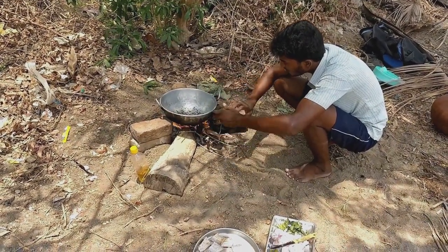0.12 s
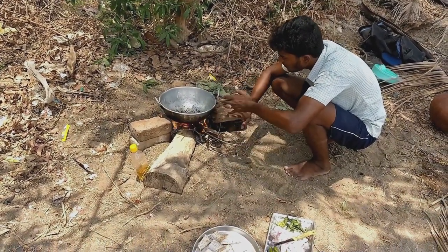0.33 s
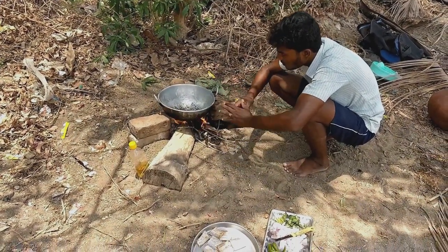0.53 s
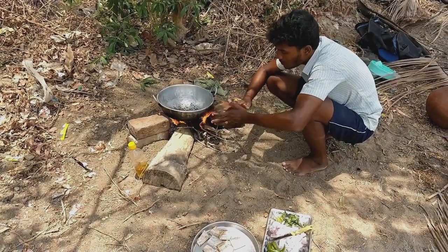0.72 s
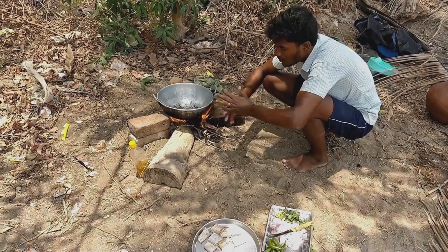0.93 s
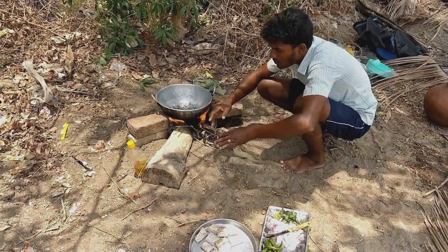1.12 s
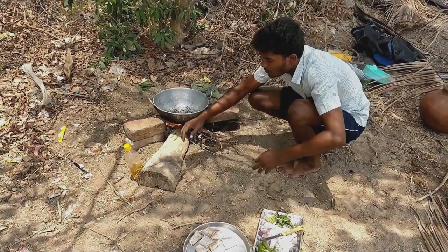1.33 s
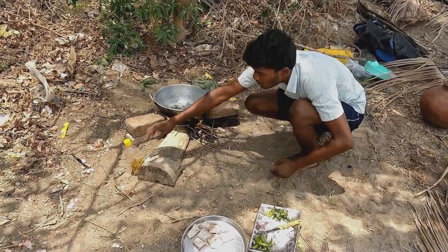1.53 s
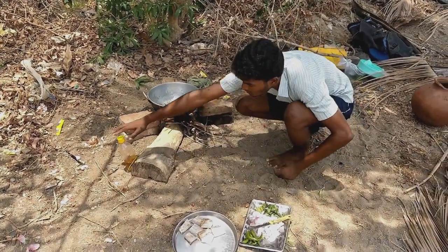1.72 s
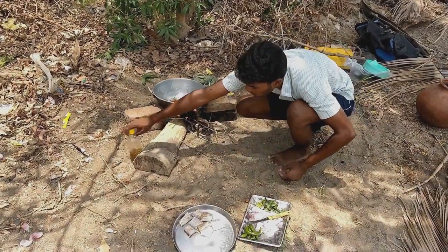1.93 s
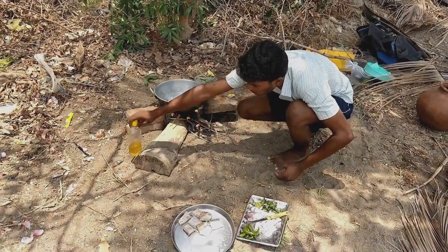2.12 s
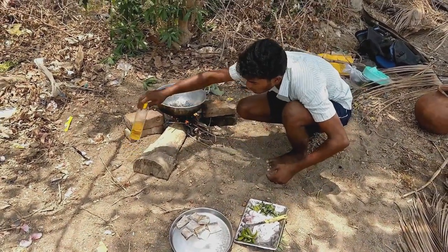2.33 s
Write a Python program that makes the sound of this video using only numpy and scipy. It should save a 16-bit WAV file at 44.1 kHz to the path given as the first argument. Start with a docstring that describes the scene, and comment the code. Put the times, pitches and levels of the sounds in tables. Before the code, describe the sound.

A small outdoor wood fire cracks loudly once, then hisses and ticks as wind buffets the microphone

```python
"""Outdoors, a small wood fire under a pan, heard at two microphone ports.
The fire hisses and roars softly (shaped noise), with low flares (narrow noise) and spits (noise bursts).
It cracks loudly once and ticks now and then: coloured impulses with scattered echoes.
A gust buffets the ports, mostly the left one: rumbling noise, wavering low thumps and a rough fizz."""
import sys
import numpy as np
from scipy import signal
from scipy.fft import rfft, irfft, next_fast_len
from scipy.io import wavfile
from scipy.ndimage import uniform_filter1d, map_coordinates

SR = 44100
rng = np.random.default_rng(int(sys.argv[2]) if len(sys.argv) > 2 else 0)


def master_out(mix):
    """Clip the mix to full scale and print it as 16-bit PCM to the path in sys.argv[1]."""
    frames = np.transpose(np.atleast_2d(mix))
    ceiling = np.clip(frames, -1, 1)
    pcm = np.round(ceiling * 32767).astype(np.int16)
    wavfile.write(sys.argv[1], SR, pcm)


N = 110250

# Source levels are nominal, ahead of the port colour.
# Wind strength before the port imbalance: (time [s], level [dB])
WIND_STRENGTH = [(0, -61), (.3, -56), (.6, -64), (.9, -54.5), (1.1, -54.5), (1.22, -45.5), (1.42, -44),
                 (1.6, -43.5), (1.75, -48.5), (1.9, -49.5), (2.1, -53.5), (2.5, -58.5)]
# Rumble spectrum: (frequency [Hz], gain [dB])
RUMBLE_TONE = [(8, 1), (25, 5.5), (40, -4), (70, -10.5), (120, -17.5), (250, -28.5), (500, -36),
               (1500, -68), (4000, -120)]
# Eddies at each port: (time [s], length, 4 sigma [s], level [dB], mean pitch [Hz])
EDDIES_LEFT = [(1.01, 0.063, -44, 39.9), (1.13, 0.047, -41, 35.1), (1.225, 0.069, -31.5, 26.05),
               (1.257, 0.019, -24, 45), (1.275, 0.024, -30, 112.7), (1.342, 0.049, -20, 65),
               (1.366, 0.023, -30, 130), (1.39, 0.044, -26, 54.74), (1.428, 0.063, -37, 40),
               (1.462, 0.043, -28.5, 50), (1.488, 0.029, -26, 84.2), (1.52, 0.037, -39, 40),
               (1.545, 0.04, -31.5, 59.9), (1.575, 0.046, -34, 40), (1.6, 0.043, -36, 60.2),
               (1.628, 0.031, -34, 80.2), (1.655, 0.052, -36.5, 50), (1.78, 0.047, -42, 35),
               (1.925, 0.043, -40, 35), (1.96, 0.04, -39, 45), (2.04, 0.044, -39.5, 40.2)]
EDDIES_RIGHT = [(.4, 0.045, -53, 40), (0.539, 0.017, -45, 40.2), (1.049, 0.026, -41, 45),
                (1.17, 0.047, -39.5, 35), (1.289, 0.049, -30, 34.8), (1.25, 0.046, -46, 30),
                (1.335, 0.027, -43, 60), (1.358, 0.05, -36, 55), (1.39, 0.062, -38, 30),
                (1.425, 0.055, -36, 35), (1.475, 0.041, -43, 35), (1.54, 0.057, -38, 35),
                (1.575, 0.029, -44, 45), (1.685, 0.031, -34.5, 45), (1.72, 0.022, -46, 45),
                (1.855, 0.047, -40, 45.3)]
# Fizz spectrum: (frequency [Hz], gain [dB])
FIZZ_TONE = [(100, -6), (200, 0), (400, -1), (800, -4), (1200, -30), (3000, -120)]
# Roar level before trim and flutter: (time [s], level [dB])
ROAR_LEVEL = [(0.0, -62.5), (0.44, -61), (0.59, -61), (1.29, -60), (1.41, -59), (1.87, -59), (2.35, -59.5),
              (2.5, -62)]
# Roar spectrum: (frequency [Hz], gain [dB])
ROAR_TONE = [(40, 4), (100, 1), (220, 0), (400, -2.5), (550, -8.5), (1000, -7), (1500, -17), (3000, -51)]
# Roar power common to both ports: (frequency [Hz], share [0-1])
ROAR_COMMON = [(100, 1), (350, 0.92), (600, 1), (1500, 0.6)]
# Hiss level before trim, flutter and crackle: (time [s], level [dB])
HISS_LEVEL = [(0, -58.7), (.31, -59.1), (.57, -58.9), (.91, -56.6), (1.09, -58.7), (1.46, -58.7),
              (1.7, -57.8), (2.04, -57.9), (2.5, -57.9)]
# Hiss spectrum: (frequency [Hz], gain [dB])
HISS_TONE = [(700, -17.5), (1500, 2), (3000, 3), (8000, -0.5), (16000, -1)]
# Hiss power common to both ports: (frequency [Hz], share [0-1])
HISS_COMMON = [(1000, 0.2), (2500, 0.49), (5000, 0.066), (12000, 0.086)]
# Short low swells of the flame: (time [s], length, 2 sigma [s], level [dB], centre [Hz])
FLARES = [(0.093, 0.071, -60, 175), (0.527, 0.031, -63, 364), (1.774, 0.037, -57, 248),
          (1.85, 0.092, -53, 211), (1.992, 0.035, -55, 276), (2.24, 0.085, -60.5, 129),
          (2.423, 0.091, -61, 247)]
# Spits, level before the swell: (time [s], half-length [s], level [dB], brightness [dB/octave])
SPITS = [(0.44, 0.035, -55, 8), (0.782, 0.041, -54.5, -2), (0.863, 0.057, -55.5, -7),
         (.92, .035, -58.5, -6.5), (0.991, 0.034, -50.5, 10), (1.006, 0.027, -53, -1),
         (1.025, 0.032, -55, -5.5), (1.057, 0.034, -56.5, -3.5), (1.561, 0.013, -55, -15),
         (1.665, 0.049, -62.5, -11.5), (2.059, 0.022, -57, -2), (2.337, 0.013, -53, -4),
         (2.355, 0.034, -52, -2.5), (2.387, 0.048, -55, 1)]
# Ticks: (time [s], impulse level [dB], brightness [dB/octave], body pitch [Hz],
#         right lags left [ms], left over right [dB])
TICKS = [(.4930, -36.5, 7, 13000, 0.012, -2), (1, -29.5, -2.5, 3820, -0.0054, -1),
         (1.007, -39, -2, 3300, 0.16, 11), (1.013, -39.5, -5.5, 3000, .03, 6),
         (1.024, -35, -1, 3300, .03, -3), (1.2955, -43, 8, 14000, .05, -2), (1.3250, -33, -6, 4800, .05, 0),
         (1.3955, -30, 3.5, 12400, .05, 3), (1.6733, -42, -3, 4500, .05, -2),
         (1.978, -24, -.5, 3500, .02, 1), (2.33, -29, 0.5, 3300, -0.26, 1.5),
         (2.3435, -40, .3, 7500, -0.26, 2), (2.356, -39, 3, 3750, -.2, -3)]
# Tick echoes: (starting level re impulse [dB], t60 [s])
TICK_ECHOES = [(-15, .012), (-26, .03)]
# Loud crack: (time [s], impulse level [dB], right lags left [ms], left over right [dB])
CRACK = (.20464, 2.5, .09, .2)
# Crack spectrum: (frequency [Hz], gain [dB])
CRACK_TONE = [(60, -16), (400, -4), (1200, -6), (1600, -10), (2700, -9), (3900, -10), (4500, -5),
              (6000, -4), (7800, -2), (9700, 6), (11000, 4), (12000, 2), (13200, 7.5), (14500, 1),
              (15500, 9), (16500, 9)]
# Crack balance by frequency: (frequency [Hz], extra left over right [dB])
CRACK_LEAN = [(1500, -2), (2700, 4), (4500, 2), (6000, -2), (7800, 3), (9700, 12), (11000, 2), (13200, -5),
              (14500, 9), (15500, -10)]
# Crack echoes, close and lingering: (starting level re impulse [dB], t60 [s])
CRACK_ECHOES = [(-21, .006), (-37, .04)]
# Colour of each port: (frequency [Hz], gain [dB])
PORT_LEFT = [(2000, -1.1), (4000, 1.1), (5800, -1.1), (6400, -7), (7200, -5), (8000, -11), (9000, -14),
             (10000, -10), (11300, -1.1), (14000, 3), (15500, 6)]
PORT_RIGHT = [(2000, -1.5), (3300, 0), (4200, 7), (5400, 11.5), (5800, 6.5), (6200, -6.5), (6800, -1.5),
              (7200, 2), (8000, 6), (8700, 0.7), (9100, -3.5), (10000, 2), (11000, 2.5), (13000, -0.5),
              (14500, 0), (15500, -47), (16200, -55)]

# Left port gains WIND_LEAN dB per dB of wind over calm, right port loses it.
WIND_LEAN, CALM_DB = 0.17, -53
EDDY_OVERTONE_SHARE, EDDY_PITCH_WAVER = .15, .22
FIZZ_DB, FIZZ_EXPONENT = -25, 1.6  # re the strongest eddy swell; fizz grows steeper than the thump
LEFT_LAG_S = .00022  # common flame noise reaches the right port first
FLARE_WIDTH = 0.16  # sigma, share of the centre
TICK_LOW_HZ, TICK_ECHO_TILT_DB_PER_OCT = 2000, -3
BODY_DB, BODY_WIDTH = 8, .22  # twig ring over the snap; sigma, share of its pitch
CRACK_ECHO_TILT_DB_PER_OCT = 1
PUSH_DB, PUSH_DECAY_S = -40.5, 0.016  # pressure dip after the crack, re its impulse
HISS_TOP_HZ, TOP_HZ, EDGE_HZ = 15900, 16900, 900


def amp(db):
    """dB to gain."""
    return 10 ** (np.asarray(db) / 20)


def unit(x):
    """Scale to rms 1."""
    return x / np.sqrt(np.mean(x ** 2) + 1e-20)


def along(points, hz):
    """Interpolate (Hz, value) points on a log axis."""
    f, v = np.transpose(points)
    return np.interp(np.log(hz + 1), np.log(f + 1), v)


def curve(rows):
    """Interpolate (s, value) rows to one value per sample."""
    s, v = np.transpose(rows)
    return np.interp(np.arange(N) / SR, s, v)


def wobble(knots_per_s):
    """Smooth random curve."""
    knots = rng.standard_normal(int(N * knots_per_s / SR) + 4)
    return map_coordinates(knots, [np.arange(N) * knots_per_s / SR])


def filtered(x, response):
    """Apply a complex frequency response."""
    n = x.shape[-1]
    m = 2 * next_fast_len(n // 2 + 4096)
    return irfft(rfft(x, m) * response(np.fft.rfftfreq(m, 1 / SR)), m)[..., :n]


def causal(gain):
    """Minimum-phase response with this gain, via the folded cepstrum."""
    c = irfft(np.log(gain))
    c[1:len(c) // 2] *= 2
    c[len(c) // 2 + 1:] = 0
    return np.exp(rfft(c))


def tilt(db_per_octave, low_hz):
    """Spectral slope over a steep high-pass, scaled to leave white-noise power unchanged."""
    def response(hz):
        slope = (hz + 700) ** (db_per_octave / 6)
        high_pass = ((hz + 30) / np.hypot(hz + 30, low_hz)) ** 3
        return causal(unit(slope * high_pass))
    return response


def shaped_noise(tone):
    """Independent noise at each port with the given spectrum, rms 1."""
    return unit(filtered(rng.standard_normal((2, N)), lambda hz: amp(along(tone, hz))))


def rumble():
    """Wind pressure noise: lumpy low noise, each port its own."""
    strength_db = curve(WIND_STRENGTH)
    lean_db = WIND_LEAN * (strength_db - CALM_DB) * [[1], [-1]]
    lumps = amp(5.4 * np.array([wobble(14.2), wobble(12)]))
    return amp(strength_db + lean_db) * unit(lumps * shaped_noise(RUMBLE_TONE))


def eddies():
    """Single eddies thump a port with a wavering low tone and shed a rough fizz."""
    thumps, swells = np.zeros((2, N)), np.zeros((2, N))
    t = np.arange(N) / SR
    for side, rows in enumerate([EDDIES_LEFT, EDDIES_RIGHT]):
        for s, length_s, db, mean_hz in rows:
            pitch_hz = mean_hz * (1 + EDDY_PITCH_WAVER * wobble(50))
            phase = 2 * np.pi * (np.cumsum(pitch_hz) / SR + rng.random())
            shape = np.sin(phase)
            shape += EDDY_OVERTONE_SHARE * np.sin(2 * phase + 1)
            shape += EDDY_OVERTONE_SHARE ** 2 * np.sin(3 * phase + 2)
            swell = amp(db) * np.exp(-.5 * (4 * (t - s) / length_s) ** 2)
            thumps[side] += swell * shape
            swells[side] += swell
    fizz_level = swells * (swells / swells.max()) ** (FIZZ_EXPONENT - 1)
    return thumps + amp(FIZZ_DB) * fizz_level * shaped_noise(FIZZ_TONE)


def wind():
    """Turbulence at the ports: broad rumble plus single eddies."""
    return rumble() + eddies()


def flame_noise(tone, common_share, patchy_db):
    """Noise with random level patches in time and frequency, from the right, partly common, rms 1."""
    z = signal.stft(rng.standard_normal((3, N)), nperseg=512)[2]
    patches = uniform_filter1d(rng.standard_normal(z.shape[1:]), size=5, axis=0)
    patches = uniform_filter1d(patches, size=3, axis=1)
    patchy = signal.istft(z * amp(patchy_db * unit(patches)), nperseg=512)[1]
    common, left, right = patchy[:, :N]

    def share(hz):
        return np.clip(along(common_share, hz), 0, 1)

    def delay(hz):
        return np.exp(-2j * np.pi * hz * [[LEFT_LAG_S], [0]])

    both = filtered(common, lambda hz: np.sqrt(share(hz)) * delay(hz))
    own = filtered(np.array([left, right]), lambda hz: np.sqrt(1 - share(hz)))
    return unit(filtered(both + own, lambda hz: amp(along(tone, hz))))


def roar():
    """Low flame noise, fluttering in level."""
    level_db = curve(ROAR_LEVEL) + 4 + 0.71 * wobble(15.0)
    return amp(level_db) * flame_noise(ROAR_TONE, ROAR_COMMON, patchy_db=1.0)


def hiss():
    """High flame noise with a fine crackle: random single samples are raised."""
    crackle = amp(rng.uniform(0, 8.2, N) * (rng.random(N) < .02))
    level_db = curve(HISS_LEVEL) + 3 + 0.6 * wobble(10) + 0.56 * wobble(50.02)
    return amp(level_db) * crackle * flame_noise(HISS_TONE, HISS_COMMON, patchy_db=2.0)


def flares():
    """Flame swells: narrow low noise that rises and fades, alike at both ports."""
    out, t = np.zeros(N), np.arange(N) / SR
    for s, length_s, db, centre_hz in FLARES:
        band = filtered(rng.standard_normal(N),
                        lambda hz: np.exp(-.5 * ((hz / centre_hz - 1) / FLARE_WIDTH) ** 2))
        swell = np.exp(-.5 * (2 * (t - s) / length_s) ** 2)
        out += amp(db) * swell * unit(band)
    return out


def spits():
    """Steam from the wood: brief noise bursts, roughened by a fast random level."""
    out, t = np.zeros((2, N)), np.arange(N) / SR
    for s, half_length_s, db, bright_db in SPITS:
        near = np.abs(t - s) < half_length_s
        swell = np.cos(np.pi / 2 * (t[near] - s) / half_length_s) ** 2
        roughness = amp(2.3 * wobble(300)[near])
        burst = unit(filtered(rng.standard_normal((2, near.sum())), tilt(bright_db, 2940)))
        out[:, near] += amp(db) * swell * roughness * burst
    return out


def snap(row, colour, echoes, echo_tilt_db, push=0):
    """Sharp impulse with scattered echoes off pan, bricks and ground, placed at both ports."""
    s, db, right_lag_ms, pan_db = row
    out, t = np.zeros((2, N + SR)), np.arange(SR // 8) / SR
    decay = sum(amp(level_db - 60 * t / t60_s) for level_db, t60_s in echoes)
    scatter = decay * (t > 3e-4) * rng.standard_normal((2, len(t)))
    impulse = t == 0
    sound = filtered(impulse + filtered(scatter, tilt(echo_tilt_db, 1000)), colour)
    sound = sound - push * np.exp(-t / PUSH_DECAY_S)
    for side, delay_s in enumerate([0, right_lag_ms / 1000]):
        start = round((s + delay_s) * SR)
        out[side, start:][:len(t)] = amp(db + pan_db * (.5 - side)) * sound[side]
    return out[:, :N]


def twig(bright_db, body_hz):
    """Colour of a tick: spectral slope with the twig's broad ring on it."""
    def response(hz):
        ring = amp(BODY_DB * np.exp(-.5 * ((hz / body_hz - 1) / BODY_WIDTH) ** 2))
        return tilt(bright_db, TICK_LOW_HZ)(hz) * causal(ring)
    return response


def ticks():
    """Small thin snaps, each coloured by its twig."""
    out = np.zeros((2, N))
    for s, db, bright_db, body_hz, *place in TICKS:
        out += snap((s, db, *place), twig(bright_db, body_hz), TICK_ECHOES, TICK_ECHO_TILT_DB_PER_OCT)
    return out


def crack():
    """Loud crack of a splitting stick, with a slow pressure dip under it."""
    def colour(hz):
        tone_db, lean_db = along(CRACK_TONE, hz), along(CRACK_LEAN, hz)
        return np.array([causal(amp(tone_db + half * lean_db)) for half in (.5, -.5)])
    return snap(CRACK, colour, CRACK_ECHOES, CRACK_ECHO_TILT_DB_PER_OCT, amp(PUSH_DB))


def scene():
    """Wind and fire at the two ports; roar, hiss and spits are low-passed at HISS_TOP_HZ."""
    fire_noise = filtered(roar() + hiss() + spits(), lambda hz: hz < HISS_TOP_HZ)
    return wind() + fire_noise + flares() + ticks() + crack()


def record(dry):
    """Each port colours the sound in its own way; nothing passes above the band limit."""
    def response(hz):
        ports = np.array([causal(amp(along(p, hz))) for p in (PORT_LEFT, PORT_RIGHT)])
        return ports * np.clip((TOP_HZ - hz) / EDGE_HZ, 0, 1) ** 2
    return filtered(dry, response)


dry = scene()
out = record(dry)
master_out(out)
```